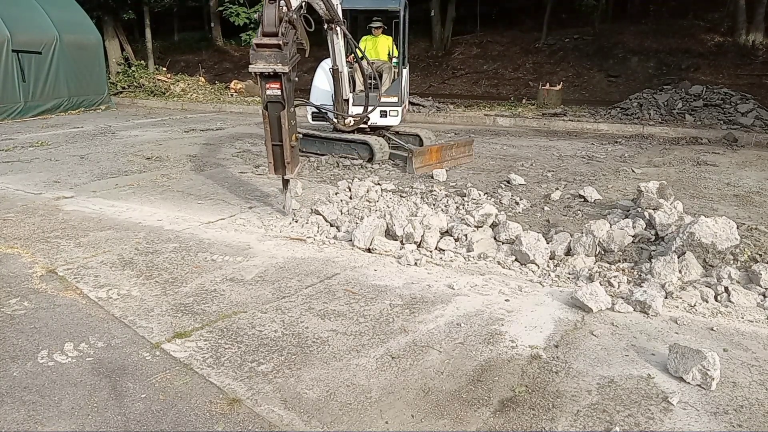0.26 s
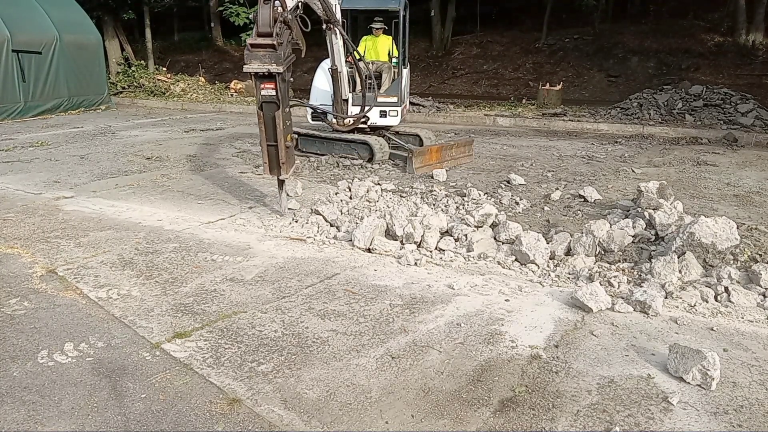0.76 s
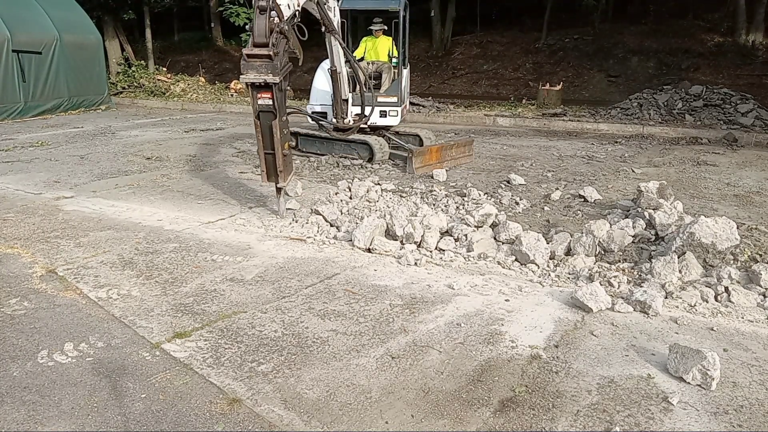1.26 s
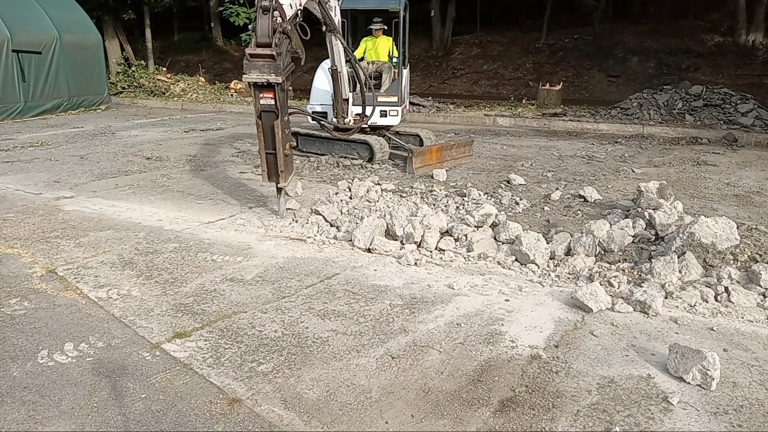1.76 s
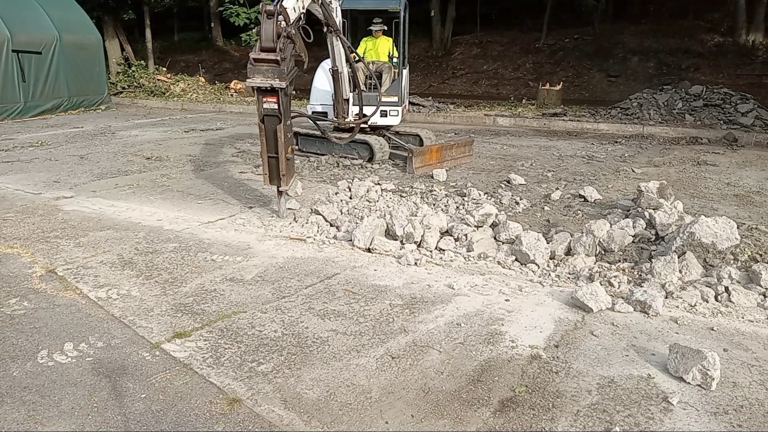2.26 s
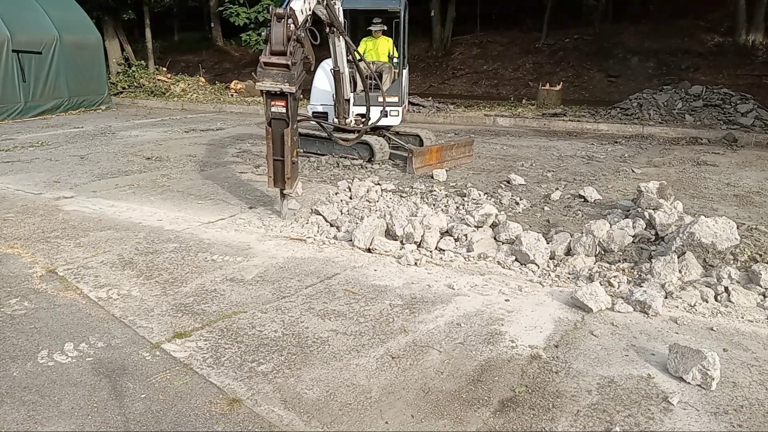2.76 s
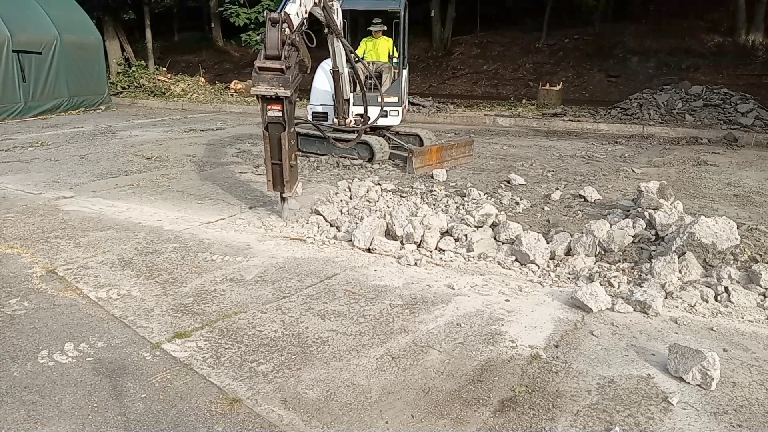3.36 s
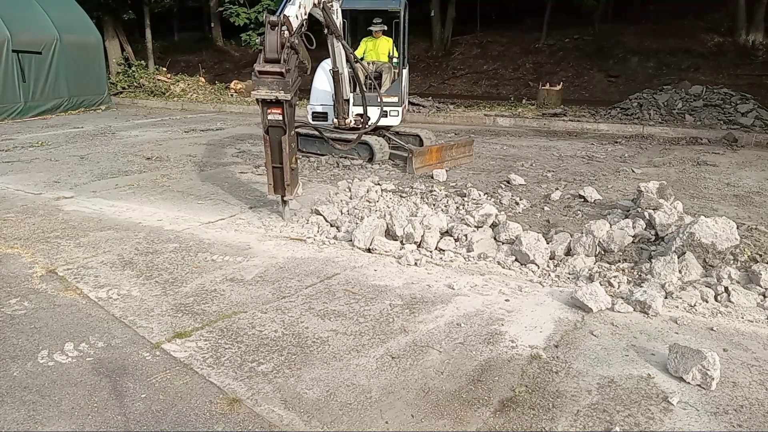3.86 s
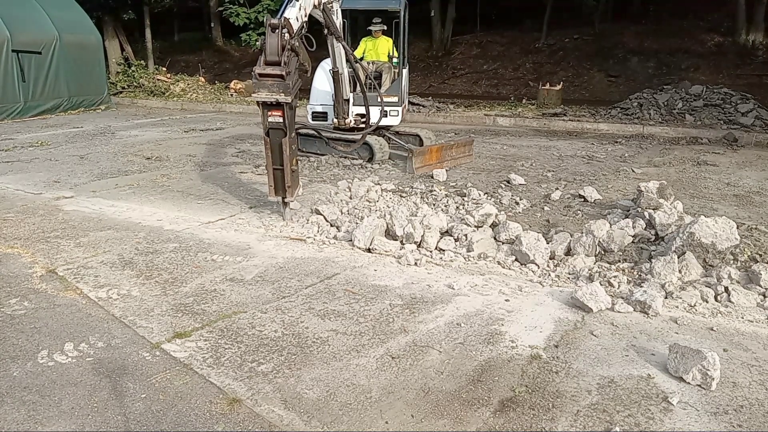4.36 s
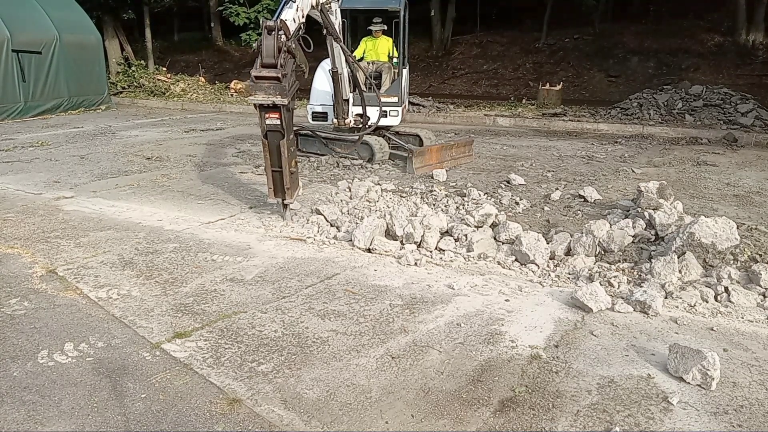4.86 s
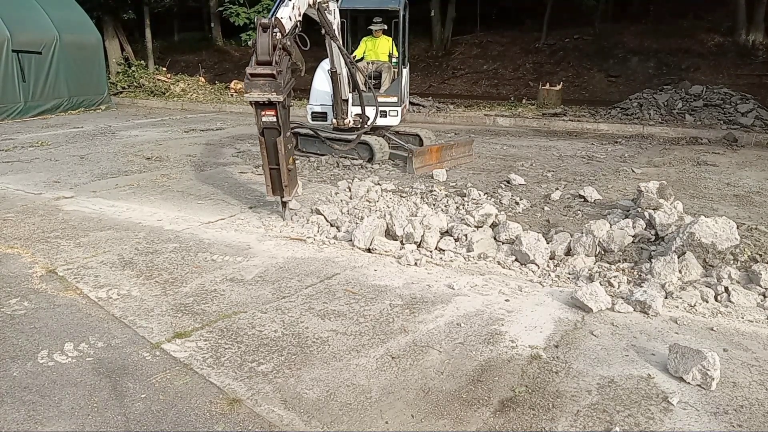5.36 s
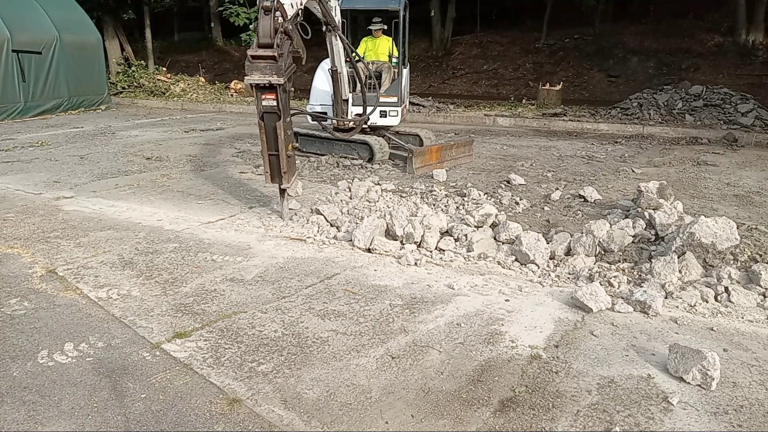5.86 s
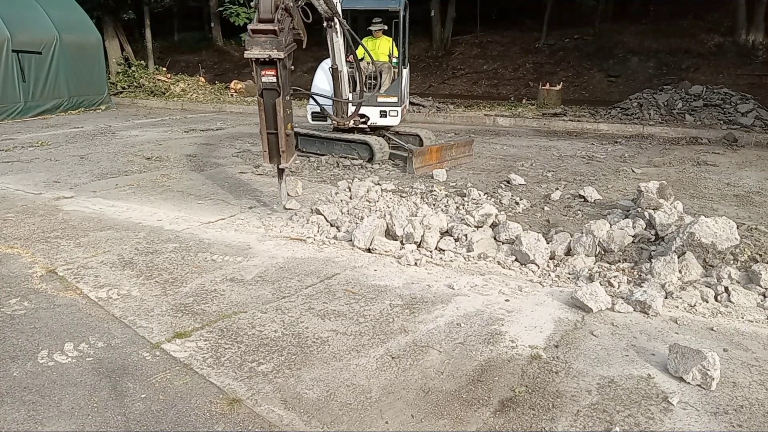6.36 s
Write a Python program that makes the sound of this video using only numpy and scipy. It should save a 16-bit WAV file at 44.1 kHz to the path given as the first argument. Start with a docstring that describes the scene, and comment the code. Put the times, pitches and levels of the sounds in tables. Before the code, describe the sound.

A small excavator's diesel engine drones outdoors with a steady fan and hydraulic hiss. The breaker's chisel sets down with a brief clatter of rubble, then hammers concrete for about three seconds, roughly ten sharp, ringing blows a second. The hammering stops, the engine swells briefly, a boom pin clunks, and the machine runs on.

```python
"""A hydraulic breaker on a small excavator hammers a concrete slab, about ten blows a second.
Each blow cracks the concrete (noise burst) and rings the steel chisel (damped modes). Chisel and rubble
knock, boom pins clink and clunk, and a noise rumble stands for rubble and returns from trees.
Behind it: diesel drone, fan and hydraulic hiss, ticking panels. A limiter ducks the blows, bass most."""
import sys
import numpy as np
from scipy import signal
from scipy.fft import rfft, irfft
from scipy.io import wavfile
from scipy.ndimage import uniform_filter1d

SR = 44100
rng = np.random.default_rng(int(sys.argv[2]) if len(sys.argv) > 2 else 0)


def store_pcm(level_fs):
    """Save levels as 16-bit WAV."""
    pcm = np.round(np.clip(level_fs, -1, 1) * 32767).astype(np.int16)
    wavfile.write(sys.argv[1], SR, np.atleast_2d(pcm).T)


N = 291060

# fan and hydraulics: freq_hz, density_db
HISS_SPECTRUM = [(210, -26.5), (350, 0.5), (411, 0), (460, -3.5), (615, -6), (906, -5.5), (1620, -9.5),
                 (2710, -11.5), (2940, -11.5), (4620, -16), (5980, -18), (7020, -24.5), (9690, -65),
                 (15500, -77), (16500, -60)]
# time_s, level_db
HISS_CURVE = [(0, -50), (1.6, -50), (1.95, -51.5), (5.0, -50.5), (5.29, -48), (5.33, -49.5), (5.54, -53.5),
              (5.56, -49.5), (6.6, -50.5)]
# pitch_hz, width_hz, level_re_hiss_db
HISS_WHISTLES = [(980, 19, -43), (2080, 81, -14), (2770, 37, -27), (4510, 150, -13.5), (7040, 650, -13)]
# diesel tones: time_s, firing_tone_db, second_harmonic_db
ENGINE_CURVE = [(0.0, -43, -42), (.3, -46, -42), (.7, -41, -39), (.76, -50, -42.5), (1.06, -44, -40),
                (1.45, -40, -40.5), (1.72, -37, -42), (1.78, -45, -41), (2.0, -45, -39.5), (3.3, -59, -48),
                (4.85, -50, -40), (5.03, -29, -24), (5.06, -35, -40.5), (5.2, -36.5, -29.5),
                (5.3, -46, -36), (5.53, -35, -26.5), (5.8, -47, -39), (6.6, -49, -35.5)]
# time_s, twice_firing_rate_hz
ENGINE_SPEED = [(0.0, 131.4), (0.09, 132.8), (0.64, 132.4), (0.77, 134.1), (1.1, 134.1), (1.34, 132.0),
                (1.86, 134.1), (2.02, 126.4), (2.09, 125.8), (4.83, 125.8), (5.04, 130.3), (5.22, 123.8),
                (5.27, 123.0), (6.6, 123.2)]
# weaker engine tones: firing_rate_multiple
ENGINE_ORDERS = [.5, 1.5, 3, 6.2, 15]
# per order: level_re_engine_base_db
ENGINE_ORDERS_DB = [-18.5, -41, -2.5, -12, -18]
# exhaust noise: freq_hz, density_db
EXHAUST_SPECTRUM = [(12, -57), (20, -9.5), (43, -21), (76, -2), (124, -2), (168, -2), (335, -7),
                    (430, -30.5), (520, -50), (1060, -120)]
# rubble and tree returns, one curve for set-down, one for hammering: time_s, level_db
RUMBLE_CURVES = [
    [(1.08, -78), (1.09, -22), (1.15, -17), (1.29, -23), (1.31, -27.5), (1.42, -30), (1.55, -47),
     (1.65, -84)],
    [(1.97, -67), (1.99, -37.5), (2.07, -28), (2.12, -23.5), (4.4, -26.5), (4.84, -33), (4.85, -29.5),
     (4.925, -38.5), (4.95, -47), (5.03, -50.5), (5.3, -62.5), (5.4, -94)],
]
# boom pins take up slack, clink then clunk: start_s, level_db
PIN_HITS = [(1.827, -28), (5.306, -20)]
# first pin: pitch_hz, level_db, t60_s
PIN_CLINK_MODES = [(1857, -4.5, 0.048), (2130, -8.5, .05), (3027, -1, 0.051), (4370, -2.5, 0.053),
                   (5330, -3, 0.093), (6940, -11, 0.037), (7680, -13, .04), (9570, -26, .04)]
# second pin: pitch_hz, level_db, t60_s
PIN_CLUNK_MODES = [(796, 6.5, 0.15), (912, -1.5, .08), (1278, -7, 0.082), (1820, -2, 0.039),
                   (2046, -11, .1), (2400, -8.5, 0.059), (3110, -14, 0.03), (6148, -16, .08)]
# a shard pings: start_s, level_db
SHARD_HITS = [(3.47, -14)]
# pitch_hz, level_db, t60_s
SHARD_PING_MODES = [(3053, 1.5, 0.069), (3360, -16, .05)]
# chisel and housing modes: pitch_hz
CHISEL_MODES_HZ = [781, 908, 995, 1233, 1850, 2143, 2250, 3110, 3515, 3770, 4180, 4320, 5287, 5680, 6060,
                   6915, 7318, 7988, 9900, 11880, 12300]
# per mode: level_db, t60_s
CHISEL_RINGS = [(-5, 0.088), (-11.5, 0.1), (-9.5, 0.082), (-9.5, 0.13), (-7, 0.04), (-11, 0.11), (-9, 0.09),
                (-10, .06), (-5.5, 0.027), (-11.5, 0.087), (-1.5, 0.094), (-8, 0.03), (-14.5, 0.17),
                (-15.5, 0.06), (-10.5, 0.12), (-16.5, 0.045), (-17, 0.081), (-11.5, 0.1), (-24.5, 0.034),
                (-34.5, 0.077), (-44, 0.039)]
# steel ringing swells again just after the last blow: start_s, level_db
LATE_STEEL_RING = [(4.848, -19.5)]
# breaking concrete: freq_hz, density_db
CRACK_SPECTRUM = [(88, -62), (150, -17), (201, -44), (409, -18), (767, -6), (1500, -7), (1860, 0),
                  (2500, -5), (4250, -2), (4970, -7.5), (6050, -3), (7810, -18.5), (11400, -46.5),
                  (15300, -62), (16500, -42)]
# slab thud: pitch_hz, level_db, t60_s
SLAB_MODES = [(222.3, -16, 0.053)]
# loose chisel and rubble: start_s, level_db, low_colour_db, high_colour_db
LOOSE_KNOCKS = [(1.086, 3.5, -18, -35), (1.104, -4.5, -1.5, -10), (1.12, 6.5, -7.5, -15),
                (1.187, -2, -13, -11), (1.258, -11, -11, -14), (1.314, -4, 5.5, -66), (1.384, -11, -4, -63),
                (1.987, -3.5, -26, -19), (2.007, -1.5, -2, -25), (2.051, -3, 3, -43),
                (2.658, -8.5, -14, -28), (3.125, -2, -33, -12), (3.228, 0, -15, -6), (3.249, -8, -41, -10),
                (3.349, -3, -14, -17), (3.471, 0, -53, -22), (3.651, -2.5, -2, -11), (3.751, 0, -28, -18),
                (3.859, -12, -24, -6), (4.277, -12, 0, -35), (4.59, -15, 0, -29), (4.74, -4, -37, -25)]
# rebound after a blow, valve tick before: offset_s, level_db, low_colour_db, high_colour_db, t60_s
BLOW_CONTACTS = [(0.0197, -21.5, -11, 2, 0.083), (-0.0142, -13, -3, -14, 0.038)]
# start_s, level_db, low_colour_db, crack_t60_s
PISTON_BLOWS = [(2.08, 1, -19, 0.12), (2.181, 4, -8, 0.11), (2.286, 3, -13, 0.062), (2.386, 1, -9, 0.11),
                (2.49, 2, -7.5, 0.092), (2.594, 3, -5.5, 0.057), (2.696, 2, -7, 0.1),
                (2.796, 0, -6.5, 0.099), (2.9, -1.5, -5.5, 0.12), (3.002, -4, -3, 0.14),
                (3.107, 0, -1, 0.068), (3.207, 1.5, -13, 0.058), (3.312, -0.5, -1.5, 0.074),
                (3.415, -2, -19, 0.059), (3.519, -2, 0, 0.12), (3.623, -1.5, -7.5, 0.055),
                (3.726, -1, -1.5, 0.061), (3.83, -3.5, -7.5, 0.091), (3.936, -3.5, -7, 0.11),
                (4.04, -1.5, -7, 0.11), (4.143, -4.5, -10, 0.11), (4.245, -1, -6.5, 0.097),
                (4.351, -2.5, -4.5, .055), (4.455, -0.5, -1.5, 0.096), (4.558, -4, -14, 0.073),
                (4.664, -0.5, -12, 0.091), (4.77, -2.5, -4, 0.068)]
# microphone resonance: centre_hz, width_hz, added_band_db
CAPSULE_PEAK = (14900, 1200, 9)

ENGINE_BASE_DB = -47
RATTLES_PER_S, RATTLE_DB, RATTLE_T60_CYCLES = 14, -56, 110
RUMBLE_FULL_DB, RUMBLE_DB_PER_OCT, STEEL_GROWTH_DB_PER_S = -24, -3.85, 2
BLOW_HIGH_COLOUR_DB, KNOCK_T60_S, LATE_T60_RATIO = -15.5, .065, 1.3
LIMIT_DB, LIMIT_DB_PER_DB = -31, 0.47
BASS_HZ, DUCK_DB, DUCK_DB_PER_DB, DUCK_MAX_DB = 410, -36, 0.56, 33
CLIP_HEIGHT, CUTOFF_HZ = 0.71, 17000


def from_db(db):
    """Decibels to gain."""
    return 10 ** (np.asarray(db) / 20)


def unit_rms(x):
    """Scale to rms 1."""
    return x / np.sqrt(np.mean(x ** 2) + 1e-20)


def curves(rows):
    """Columns of a time table at every sample."""
    time_s, *columns = np.transpose(rows)
    return [np.interp(np.arange(N) / SR, time_s, column) for column in columns]


def butter(x, order, edge_hz, kind="low"):
    """Causal Butterworth filter."""
    return signal.sosfilt(signal.butter(order, edge_hz, kind, fs=SR, output="sos"), x)


def drift(rate_hz):
    """Slow random wander, rms 1."""
    step = 40
    pole = np.exp(-2 * np.pi * step * rate_hz / SR)
    slow = signal.lfilter([1], [1, -2 * pole, pole * pole], rng.standard_normal(N // step + 2002))[2000:]
    return np.interp(np.arange(N) / step, np.arange(len(slow)), unit_rms(slow))


def ring(force, hz, t60_s):
    """Damped mode: a unit click rings a sine of height 1."""
    r, w = from_db(-60 / (t60_s * SR)), 2 * np.pi * hz / SR
    return signal.lfilter([0, np.sin(w)], [1, -2 * r * np.cos(w), r * r], force + 1e-18)


def coloured_noise(spectrum):
    """Noise shaped to a spectrum, rms 1."""
    hz, db = np.transpose(spectrum)
    bins_hz = np.arange(1, N // 2 + 2) * SR / N
    gain = from_db(np.interp(np.log(bins_hz), np.log(hz), db))
    return unit_rms(irfft(rfft(rng.standard_normal(N)) * gain, N))


def narrow_noise(hz, width_hz):
    """Steep-sided noise round one pitch, rms 1."""
    t60_s = np.log(1000) / (np.pi * width_hz)
    return unit_rms(ring(ring(rng.standard_normal(N), hz, t60_s), hz, t60_s / 4))


def noise_bands(spectrum, low_hz, high_hz, count):
    """Centres and bands of coloured noise; neighbours independent, sum rms 1."""
    edges_hz = np.geomspace(low_hz, high_hz, count + 1)
    noises = [coloured_noise(spectrum), coloured_noise(spectrum)]
    bands = np.array([butter(noises[k % 2], 2, edges_hz[k:k + 2], "band") for k in range(count)])
    return np.sqrt(edges_hz[1:] * edges_hz[:-1]), bands / np.sqrt(np.mean(bands.sum(0) ** 2))


def struck(hits, modes, scatter_db, contact_s, roughness):
    """Each hit drives every mode with a click plus decaying contact noise."""
    starts = np.array([round(hit[0] * SR) for hit in hits])
    hit_db = np.array(hits)[:, 1]
    pole = np.exp(-1 / (contact_s * SR))
    out = np.zeros(N)
    span = out[starts[0]:starts[-1] + SR // 2]
    for hz, db, t60_s in modes:
        clicks = np.zeros(len(span))
        clicks[starts - starts[0]] = from_db(hit_db + db + scatter_db * rng.standard_normal(len(hits)))
        contact = signal.lfilter([np.sqrt(1 - pole * pole)], [1, -pole], clicks)
        span += ring(clicks + roughness * contact * rng.standard_normal(len(span)), hz, t60_s)
    return out


def hiss():
    """Fan and hydraulic noise with faint wavering whistles."""
    noise = coloured_noise(HISS_SPECTRUM)
    whistles = sum(from_db(db + 3.2 * drift(11)) * narrow_noise(hz, width_hz)
                   for hz, width_hz, db in HISS_WHISTLES)
    return from_db(curves(HISS_CURVE)[0]) * (noise + whistles)


def panel_rattles():
    """Loose panels tick at random: faint short rings at scattered pitches."""
    pitches_hz = np.geomspace(900, 5200, 12)
    panel = rng.integers(0, len(pitches_hz), N)
    onsets = rng.random(N) < RATTLES_PER_S / SR
    ticks = onsets * from_db(RATTLE_DB + 5.4 * np.minimum(rng.exponential(1, N), 3))
    rings = sum(ring(ticks * (panel == k), hz, RATTLE_T60_CYCLES / hz) for k, hz in enumerate(pitches_hz))
    return butter(rings, 4, 6000)


def diesel_engine():
    """Firing tone and its orders waver over exhaust noise."""
    firing_db, second_db = curves(ENGINE_CURVE)
    phase = np.pi * np.cumsum(curves(ENGINE_SPEED)[0]) / SR
    firing = from_db(firing_db + 0.56 * drift(3.1)) * np.sin(phase)
    second = from_db(second_db + 1.44 * drift(5.4)) * np.sin(2 * phase + 1)
    tones = np.sqrt(2) * (firing + second)
    for order, db in zip(ENGINE_ORDERS, ENGINE_ORDERS_DB):
        tones += from_db(ENGINE_BASE_DB + db + 4.9 * drift(5.1)) * np.sin(order * phase + drift(8))
    exhaust = from_db(ENGINE_BASE_DB + 3 + 2.2 * drift(2.2)) * coloured_noise(EXHAUST_SPECTRUM)
    return tones + exhaust


def rumble():
    """Lumpy rubble noise and shaken chisel modes; fading, it dulls and steel outlasts rubble."""
    time_s = np.arange(N) / SR
    set_down, run = RUMBLE_CURVES
    level_db, = curves(set_down + run)
    hammering = time_s > run[0][0]
    fade_db = np.maximum(RUMBLE_FULL_DB - level_db, 0)
    # the floor holds the tilt constant while hammering
    tilt_db_per_oct = np.maximum(RUMBLE_DB_PER_OCT - .45 * fade_db, np.where(hammering, 2, -6.5))
    centres_hz, bands = noise_bands(CRACK_SPECTRUM, 189.5, 16900, count=14)
    lumps_db = 1.74 * drift(48)
    rubble, steel = np.zeros(N), np.zeros(N)
    for hz, band in zip(centres_hz, bands):
        tree_loss_db = 9 * np.log2(max(hz / 8000, 1))   # trees return little top
        colour_db = tilt_db_per_oct * np.log2(hz / 2000) - tree_loss_db
        rubble += band * from_db(lumps_db + 1.63 * drift(36) + colour_db)
    for hz, (db, t60_s) in zip(CHISEL_MODES_HZ, CHISEL_RINGS):
        tilt_db = 4.5 * tilt_db_per_oct * np.log2(max(hz / 4500, 1))
        top_loss_db = 3.5 * fade_db * np.log2(max(hz / 6500, 1))
        steel += from_db(db + 3.4 * drift(15) + tilt_db - top_loss_db) * narrow_noise(hz, 6.6 / t60_s)
    steel_db = np.where(hammering, -4, -22) + np.minimum(0.47 * fade_db, 5)
    # steel takes over as the chisel sinks in
    first_s, last_s = PISTON_BLOWS[0][0], PISTON_BLOWS[-1][0]
    shift_db = STEEL_GROWTH_DB_PER_S * np.clip(time_s - first_s, 0, last_s - first_s)
    mix = from_db(-shift_db / 2) * rubble + from_db(steel_db + shift_db / 2) * unit_rms(steel)
    return from_db(level_db) * mix


def boom_pins():
    """Pins take up slack: a blunt clink, then a soft greased clunk."""
    clink = struck(PIN_HITS[:1], PIN_CLINK_MODES, scatter_db=0, contact_s=0.011, roughness=2.3)
    clunk = struck(PIN_HITS[1:], PIN_CLUNK_MODES, scatter_db=0, contact_s=0.033, roughness=1.85)
    return butter(clink, 2, 10500) + butter(clunk, 4, 7500)


def shard_ping():
    """One shard rings briefly."""
    return struck(SHARD_HITS, SHARD_PING_MODES, scatter_db=0, contact_s=0.0079, roughness=1.3)


def chisel():
    """Steel rings at each blow and swells again just after the last, its middle modes ringing longer."""
    modes = [(hz, db, t60_s) for hz, (db, t60_s) in zip(CHISEL_MODES_HZ, CHISEL_RINGS)]
    late_modes = [(hz, db, LATE_T60_RATIO * t60_s) for hz, db, t60_s in modes if hz < 9000]
    driven = struck(PISTON_BLOWS, modes, scatter_db=3.5, contact_s=0.017, roughness=2.21)
    late = struck(LATE_STEEL_RING, late_modes, scatter_db=2.1, contact_s=0.049, roughness=1.64)
    return from_db(-15.5) * driven + butter(late, 2, [2600, 5200], "band")


def cracks(noise, hits, rise_s, scatter_db, gain_db):
    """One noise burst per hit, each with its own colour; treble dies sooner."""
    centres_hz, bands = noise
    out, age_s = np.zeros(N), np.arange(SR // 8) / SR
    knots_hz = [350, 900, 1800, 6500, 10000]
    for start_s, db, low_db, high_db, t60_s in hits:
        knots_db = [-3, low_db + 10.5, 0, min(0.44 * (high_db + 19), 0), high_db + 25]
        colour_db = np.interp(np.log(centres_hz), np.log(knots_hz), knots_db)
        colour_db += scatter_db * rng.standard_normal(len(centres_hz))
        band_t60_s = np.maximum(t60_s * (centres_hz[:, None] / 2000) ** -.35, .005)
        decay = from_db(db + gain_db + colour_db[:, None] - 60 * age_s / band_t60_s)
        attack = 1 - np.exp(-age_s / rise_s)
        span = slice(round(start_s * SR), round(start_s * SR) + len(age_s))
        out[span] += (decay * bands[:, span]).sum(0) * attack
    return out


def breaker_impacts():
    """Blows crack the concrete and thud the slab, amid rebounds, valve ticks and loose knocks."""
    noise = noise_bands(CRACK_SPECTRUM, 200.5, 17480, count=16)
    blows = [(*blow, BLOW_HIGH_COLOUR_DB, t60_s) for *blow, t60_s in PISTON_BLOWS]
    knocks = [(*knock, KNOCK_T60_S) for knock in LOOSE_KNOCKS]
    contacts = []
    for offset_s, *sound in BLOW_CONTACTS:
        for blow in PISTON_BLOWS[:-1] if offset_s > 0 else PISTON_BLOWS[1:]:   # only between blows
            contacts.append((blow[0] + offset_s + rng.normal(0, 0.0027), *sound))
    return (cracks(noise, blows, rise_s=0.00053, scatter_db=0, gain_db=-1.5)
            + cracks(noise, knocks, rise_s=0.0042, scatter_db=4.5, gain_db=-5)
            + cracks(noise, contacts, rise_s=0.00076, scatter_db=0.5, gain_db=-1.5)
            + struck(PISTON_BLOWS, SLAB_MODES, scatter_db=1.5, contact_s=.01, roughness=.3))


def treble_excess_db(x, threshold_db, ahead_s, release_db_per_s):
    """Level above 500 Hz in excess of a threshold, with peak hold and look-ahead."""
    power = uniform_filter1d(butter(x, 2, 500, "high") ** 2, size=200)
    level_db = 10 * np.log10(np.abs(power) + 1e-12)
    ramp_db = release_db_per_s * np.arange(N) / SR
    held_db = np.maximum.accumulate(level_db + ramp_db, axis=-1) - ramp_db
    ahead = round(ahead_s * SR)
    return uniform_filter1d(np.maximum(held_db - threshold_db, 0), 2 * ahead, origin=-ahead)


def limiter(x):
    """Gain dips just ahead of loud treble, then recovers; bass dips further."""
    bass = signal.sosfiltfilt(signal.butter(3, BASS_HZ, fs=SR, output="sos"), x, padlen=SR // 10)
    duck_db = DUCK_DB_PER_DB * treble_excess_db(x, DUCK_DB, ahead_s=0.006, release_db_per_s=206)
    limit_db = LIMIT_DB_PER_DB * treble_excess_db(x, LIMIT_DB, ahead_s=0.0083, release_db_per_s=167)
    return (x - bass) * from_db(-limit_db) + bass * from_db(-np.minimum(duck_db, DUCK_MAX_DB))


def scene():
    """Mono mix of breaker and background."""
    breaker = breaker_impacts() + chisel() + shard_ping() + boom_pins() + rumble()
    breaker = butter(breaker, 4, 165, "high")   # small parts radiate no deep bass
    return (breaker + diesel_engine() + hiss() + panel_rattles())[None]


def record(dry):
    """Limiter, soft clip, capsule resonance, steep low-pass."""
    clipped = CLIP_HEIGHT * np.tanh(limiter(dry) / CLIP_HEIGHT)
    hz, width_hz, db = CAPSULE_PEAK
    resonance = signal.lfilter(*signal.iirpeak(hz, hz / width_hz, fs=SR), clipped)
    low_pass = signal.cheby2(12, 70, CUTOFF_HZ, fs=SR, output="sos")
    return signal.sosfilt(low_pass, clipped + from_db(db) * resonance)


dry = scene()
out = record(dry)
store_pcm(out)
```